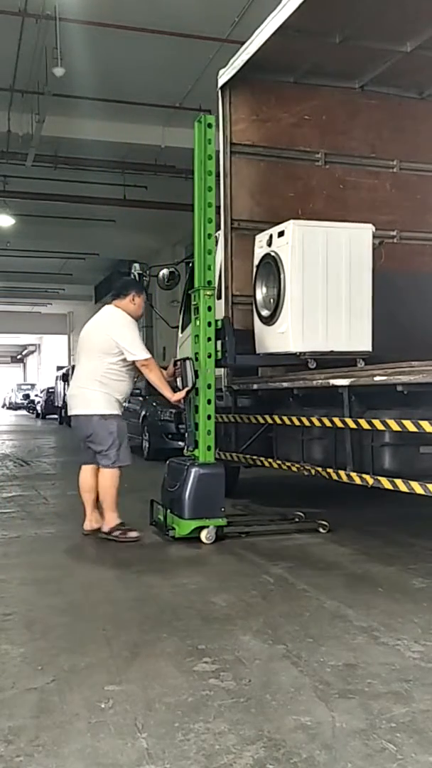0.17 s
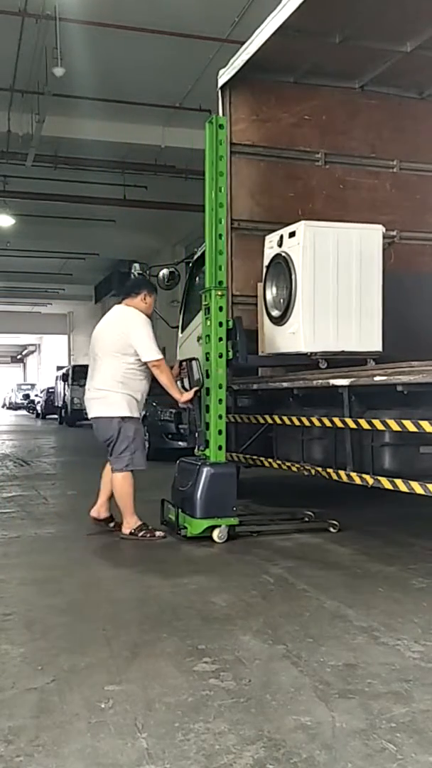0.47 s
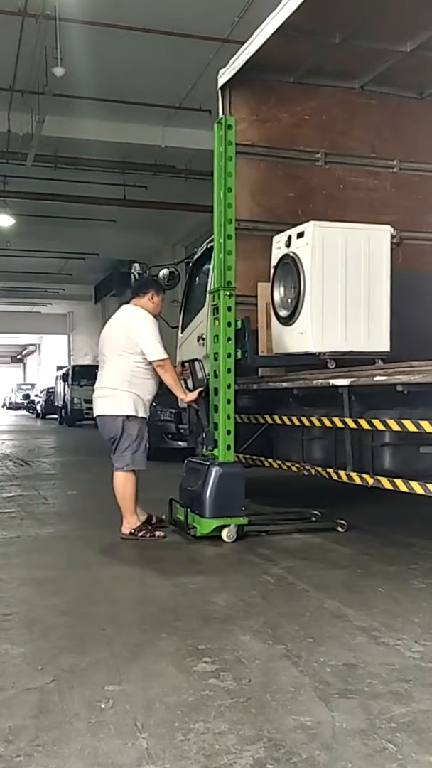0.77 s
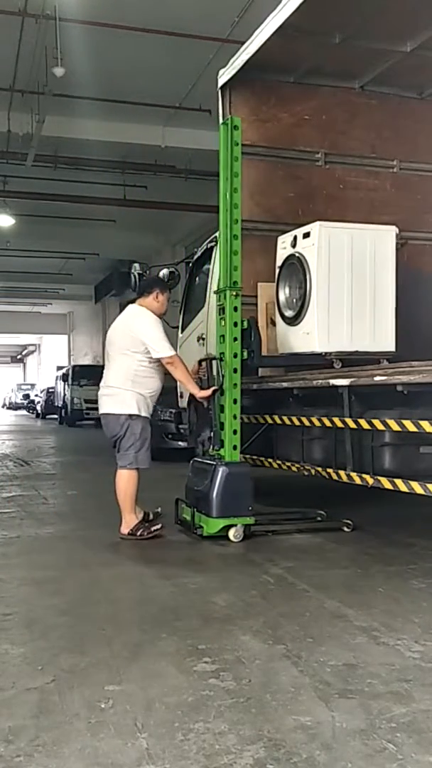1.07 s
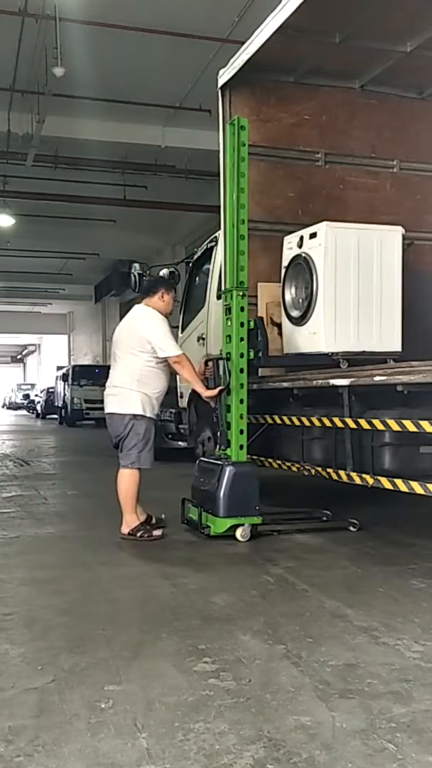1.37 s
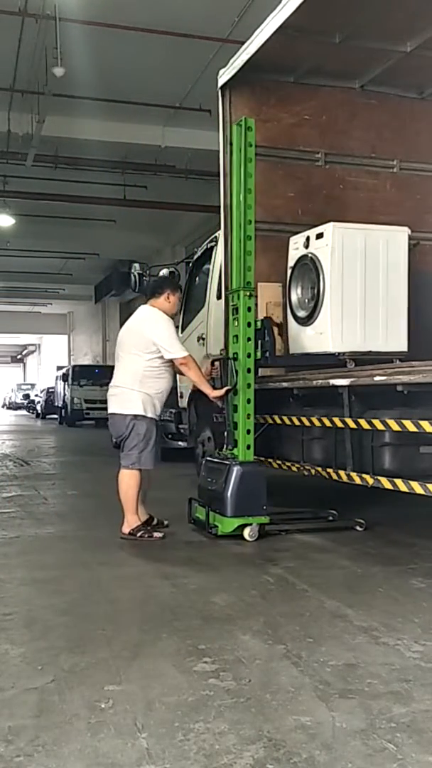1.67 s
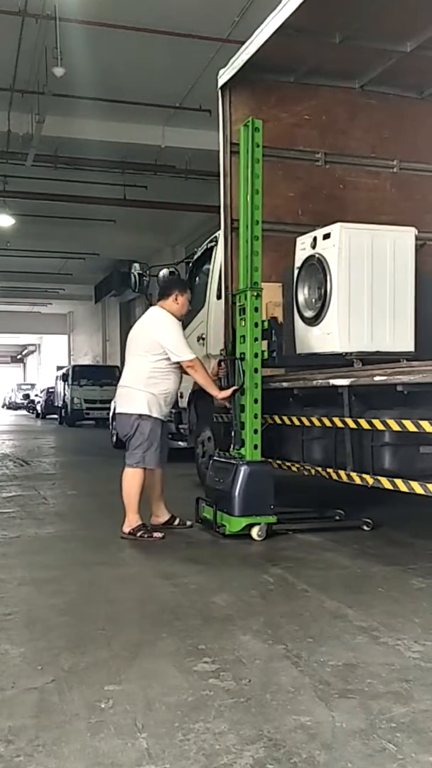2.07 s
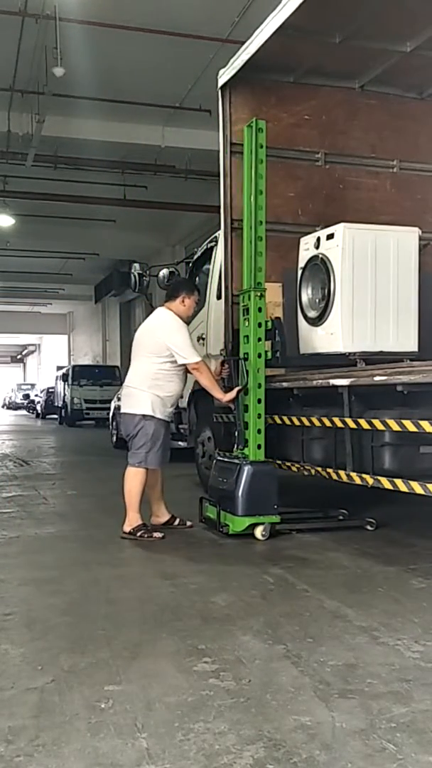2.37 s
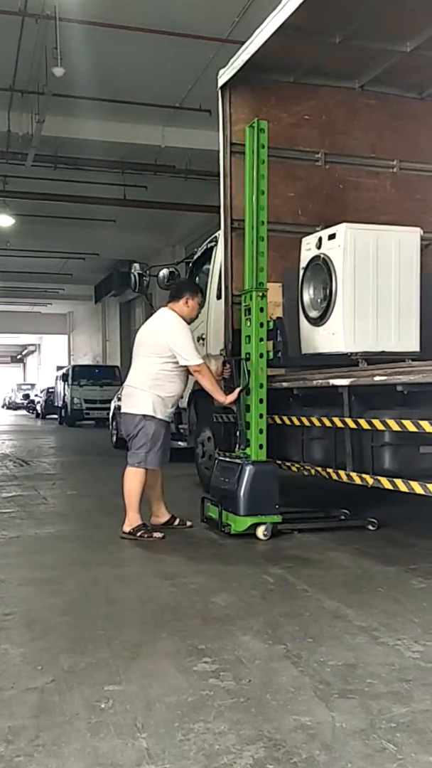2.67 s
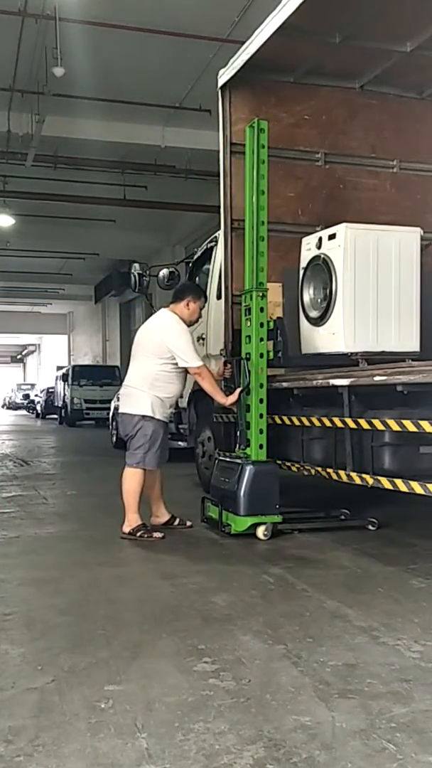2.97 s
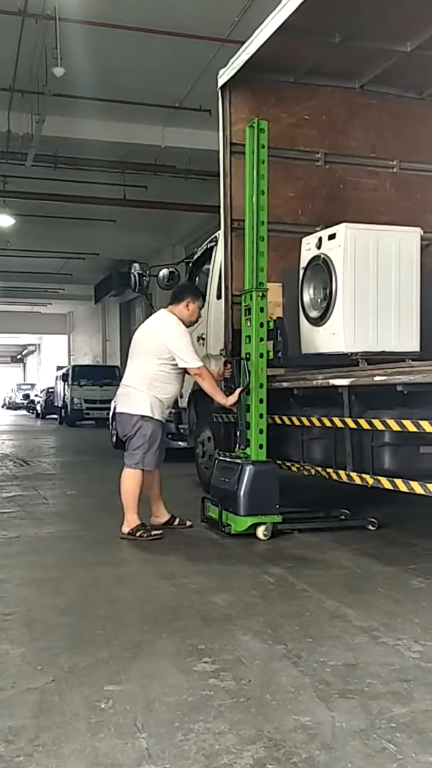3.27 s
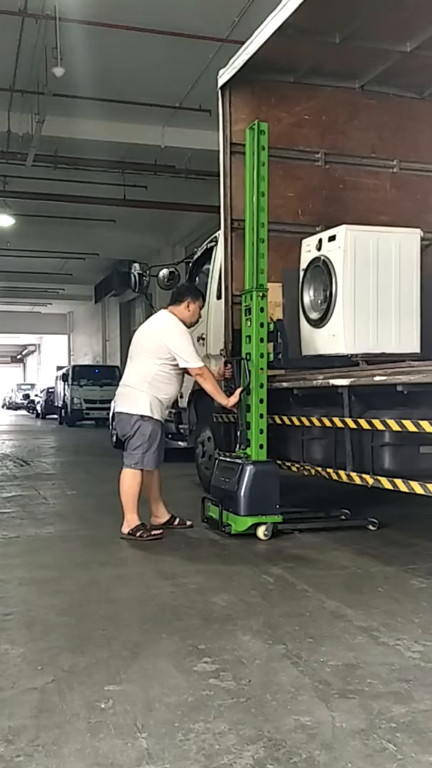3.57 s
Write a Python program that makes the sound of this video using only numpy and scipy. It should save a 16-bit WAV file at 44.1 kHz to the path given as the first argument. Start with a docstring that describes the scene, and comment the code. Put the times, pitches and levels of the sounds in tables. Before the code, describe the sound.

A pallet stacker rumbles and clanks over rough concrete in an echoing bay, then rolls more softly.

```python
"""A pallet stacker is pushed over rough concrete in a covered loading bay, over a steady roar and hum.
To 1.6 s: wheels rumble and rush, bumps thump chassis and forks, the loose mast clanks, the hall rings on.
Then it rolls on more softly, with a last swell of rumble near 3.47 s, still rolling at the end.
Low drones swell near 0.4, 2.4 and 3.47 s; a grainy hiss sets in at 3.5 s, one more clank at 3.72 s.
Blows and grit excite decaying modes plus dense noise; rush, roar, hiss and hall are shaped noise."""
import sys
import numpy as np
from scipy import signal
from scipy.fft import rfft, irfft
from scipy.io import wavfile

SR = 44100
rng = np.random.default_rng(int(sys.argv[2]) if len(sys.argv) > 2 else 0)


def log_audio(samples):
    """Write samples as a 16-bit WAV file to the path given in sys.argv[1]."""
    # one column per channel
    frames = np.atleast_2d(samples).T
    # limit to full scale, then quantise
    limited = np.clip(frames, -1, 1)
    pcm = np.round(limited * 32767).astype(np.int16)
    wavfile.write(sys.argv[1], SR, pcm)


N = 164493

LOW_HALL_SEND_DB = -3  # chassis and forks sit near the floor and feed the hall less


def stacker():
    """Bumps and grit ring chassis, forks and mast, direct and via the hall; the wheels add a rush."""
    chassis_roll, forks_roll, mast_roll = rolling()
    low = chassis_roll + forks_roll + thumps()
    high = mast_roll + clanks()
    reverb = hall(amp(LOW_HALL_SEND_DB) * low + high)
    return low + high + reverb + rush()


# wheel bumps: t/s, chassis thud level/dB, fork knock level/dB, thud lower edge f/Hz
THUMPS = [(.208, 2.5, -6, 121.7), (.303, -5, 7.5, 200), (0.501, 8, 9.5, 130), (0.561, 8, 1, 101),
          (0.611, 5, -11, 147), (0.666, 10.5, 0, 230), (0.723, 1, -5, 198), (.775, 3.5, -5, 120),
          (0.841, 0.5, -9, 120), (1.047, -3, 8, 229), (1.126, 5.5, -3, 150), (1.358, 2.5, 0, 130),
          (1.607, -7, -2.5, 196)]


def thumps():
    """A wheel drops into a dent: chassis and forks are struck once."""
    out = np.zeros((2, N))
    for start_s, thud_db, knock_db, edge_hz in THUMPS:
        thud = amp(thud_db) * above(chassis_ring(), edge_hz)
        knock = amp(knock_db) * forks_ring()
        add(out, start_s, thud + knock)
    return out


# mast slaps: t/s, level/dB, rattle decay to 1/e /s, lower edge f/Hz
CLANKS = [(0.293, 3.5, 0.013, 1000), (.317, 2, 0.0099, 685), (0.371, -6, 0.011, 600),
          (0.485, 1, 0.008, 1710), (.492, 9, 0.023, 970), (0.508, 10.5, 0.015, 750),
          (.556, 0.5, .008, 1310), (.581, -2, .006, 1100), (0.603, -6, 0.0086, 637),
          (.63, -2.5, 0.0091, 800), (0.658, -5, 0.0067, 3070), (0.666, 3, 0.016, 587),
          (.72, -7.5, 0.01, 617), (1.011, 5.5, 0.039, 1150), (1.035, 4, 0.025, 1260),
          (1.119, -1, 0.013, 1210), (1.149, -4, 0.022, 880), (1.35, -1.5, 0.019, 950),
          (1.605, -9, 0.028, 820), (3.72, 5, 0.016, 876)]
RATTLES_PER_S, RATTLE_SHARE = 1200, 0.71  # share: amplitude weight against the first blow
CLANK_CROWD_DB = 3.5  # re tones


def clanks():
    """The loose mast slaps against its guides and rattles: one blow plus fading random impulses."""
    out = np.zeros((2, N))
    t = np.arange(SR // 5) / SR
    for start_s, db, decay_s, edge_hz in CLANKS:
        hits = rng.random(len(t)) < RATTLES_PER_S / SR
        rattle = rng.choice([-1, 1], len(t)) * hits * np.exp(-t / decay_s)
        force = RATTLE_SHARE * unit_energy(rattle) + (1 - RATTLE_SHARE) * (t == 0)
        clank = signal.fftconvolve(force[None], mast_ring(CLANK_CROWD_DB), axes=1)
        add(out, start_s, amp(db) * above(clank, edge_hz))
    return out


GRIT_CROWD_DB = 6  # re tones; grit shakes the mast all over, so its tones stand out less


def rolling():
    """Grit forces convolved with the ring of chassis, forks and mast."""
    parts = chassis_ring(), forks_ring(), mast_ring(GRIT_CROWD_DB)
    return [signal.fftconvolve(force[None], part, axes=1)[:, :N] for force, part in zip(grit(), parts)]


# rolling: t/s, wheel rumble level/dB, grit chatter level/dB
ROLL = [(0, -32.5, -35), (.25, -35.5, -43), (.45, -38.5, -47), (.65, -34.5, -35), (.95, -35.5, -40.5),
        (1.2, -40.5, -42), (1.5, -34.5, -43), (1.7, -45.5, -40.5), (2.0, -39, -44.5), (2.4, -44.5, -50.5),
        (3.0, -42.5, -59), (3.3, -47.5, -56), (3.47, -35.5, -47), (3.73, -49.5, -46)]
GRIT_PER_S, GRIT_SPREAD_DB = 550, 5
FORK_RUMBLE_DB = -3  # re chassis rumble


def grit():
    """Small random knocks of rough concrete under the wheels: one row of force per part."""
    size = amp(GRIT_SPREAD_DB * np.minimum(rng.exponential(1, (3, N)), 4))
    signed = size * rng.choice([-1, 1], (3, N))
    knocks = unit(signed * (rng.random((3, N)) < GRIT_PER_S / SR))
    rumble = level(ROLL, index=1)
    chatter = level(ROLL, index=2)
    return knocks * np.array([rumble, amp(FORK_RUMBLE_DB) * rumble, chatter])


# chassis modes: f/Hz, relative level/dB, t60/s
CHASSIS = [(165.3, -6, 0.14), (223.5, 3.5, 0.23), (260, -3, 0.24), (292.2, -2.5, 0.14), (502.3, -9.5, 0.3),
           (530.3, -3.5, 0.36)]
# dense resonances of chassis and forks: f/Hz, relative density level/dB per Hz
THUD = [(40, -13.5), (140, 1.5), (250, 1), (450, -2), (550, -1), (680, -9.5), (1100, -9), (2000, -31.5),
        (5000, -47.5), (15000, -87)]
CHASSIS_CROWD_DB = -7.5  # re tones


def chassis_ring():
    """The chassis answers one blow with low modes over a short thud."""
    return ring(CHASSIS, THUD, CHASSIS_CROWD_DB)


# fork modes: f/Hz, relative level/dB, t60/s
FORKS = [(371, 1, 0.22), (787, -17, 0.13)]
FORKS_CROWD_DB = -16.5  # re tones


def forks_ring():
    """The forks answer one blow with two modes over a faint short thud."""
    return ring(FORKS, THUD, FORKS_CROWD_DB)


# mast modes: f/Hz, relative level/dB, t60/s
MAST = [(1009, -3, 0.17), (1205, -6, 0.079), (1331.4, -1.5, 0.23), (1748, -7, 0.11), (2330, -5, 0.28),
        (2500, -3.5, 0.16), (2542, -5.5, 0.14), (2630, -3, 0.14), (2694, -9, 0.13), (3343, -12, .07),
        (3510, -8, 0.15), (3600, -14.5, 0.082), (4430, -13.5, 0.11)]
# dense resonances of the mast: f/Hz, relative density level/dB per Hz
CLATTER = [(100, -27.5), (400, -3), (700, 2), (1000, 6), (1350, -1.5), (2000, -1.5), (2700, -1), (3700, -9),
           (5200, -23.5), (6400, -25.5), (8000, -50), (12000, -51.5), (15000, -48.5)]


def mast_ring(crowd_db):
    """The steel mast answers one blow with high modes over a short clatter."""
    return ring(MAST, CLATTER, crowd_db)


CROWD_T60_S, CONTACT_S = 0.053, 0.0024
STRIKE_DETUNE, STRIKE_SPREAD_DB = 0.0053, 2.5  # rms, detune as fraction of f; no two blows land alike


def ring(modes, crowd, crowd_db):
    """Response to one blow: dying tones with a left-right phase gap, plus dense decaying noise."""
    size = SR // 3
    t = np.arange(size) / SR
    tones = 0
    for hz, db, t60_s in modes:
        detune, weight, side = rng.standard_normal(3)
        # phase gap that gives the tone its left-right correlation
        lead = np.sign(side) * np.arccos(np.clip(at_hz(ALIKE, hz), -1, 1)) / 2
        struck_hz = hz * (1 + STRIKE_DETUNE * detune)
        tone = np.sin(2 * np.pi * struck_hz * t + [[lead], [-lead]])
        tones = tones + amp(db + STRIKE_SPREAD_DB * weight) * unit_energy(tone * amp(-60 * t / t60_s))
    dense = colour(pair(size), crowd) * amp(-60 * t / CROWD_T60_S)
    both = unit_energy(tones) + amp(crowd_db) * unit_energy(dense)
    soft_onset = 1 - np.exp(-(t / CONTACT_S) ** 2)
    return unit_energy(both * soft_onset)


# spectrum of the rush: f/Hz, relative density level/dB per Hz
RUSH = [(100, -3), (400, 6), (800, 4), (1100, 1.5), (1800, -11), (2800, -13), (4200, -14), (5200, -22.5),
        (6500, -43.5), (8000, -46.5), (9700, -60), (11700, -40), (14500, -54)]
# rush over time: t/s, level/dB
RUSH_LEVEL = [(0, -30.5), (.4, -33), (.65, -28.5), (1, -37), (1.5, -36.5), (1.72, -33), (2.1, -36),
              (2.5, -39.5), (3, -50), (3.73, -40)]


def rush():
    """Soft rush of the wheels on concrete: coloured stereo noise."""
    return level(RUSH_LEVEL) * unit(colour(pair(N), RUSH))


# hall decay: f/Hz, t60/s
HALL = [(100, 0.7), (400, 0.45), (1000, 1.04), (2700, 0.77), (6000, 0.68), (13000, 0.52)]
HALL_DB, HALL_BUILD_S = -4, 0.018


def hall(x):
    """Tail of the concrete bay: noise decaying per frequency, after a linear build-up."""
    hz, s, bins = signal.stft(pair(SR), SR, nperseg=256)
    decayed = bins * amp(-60 * s / at_hz(HALL, hz)[:, None])
    tail = signal.istft(decayed, SR, nperseg=256)[1][:, :SR]
    tail = tail * np.minimum(np.arange(SR) / SR / HALL_BUILD_S, 1)
    return amp(HALL_DB) * signal.fftconvolve(x, unit_energy(tail), axes=1)[:, :N]


# spectrum of the hiss: f/Hz, relative density level/dB per Hz
HISS = [(200, 3), (700, 4), (1400, -2), (2200, -6.5), (3200, -2.5), (4400, -13.5), (5200, -19), (6500, -21),
        (9000, -37), (11000, -30), (13000, -22), (15000, -49)]
# hiss over time: t/s, level/dB
HISS_LEVEL = [(3.505, -60), (3.517, -38.5), (3.54, -33.5), (3.59, -38), (3.68, -38.5), (3.73, -35.5)]
HISS_GRAIN_DB, HISS_GRAIN_HZ = 1, 181  # rms depth, corner of the flutter


def hiss():
    """A hiss that starts with a spurt and holds: coloured noise with random level flutter."""
    started = np.arange(N) / SR > HISS_LEVEL[0][0]
    grain = amp(HISS_GRAIN_DB * drift(HISS_GRAIN_HZ))
    return started * level(HISS_LEVEL) * unit(colour(pair(N), HISS) * grain)


# drones: middle t/s, half length to 1/e /s, f/Hz, level at the middle/dB
DRONES = [(0.406, 0.053, 307, -33.5), (2.398, 0.085, 123, -35), (3.47, 0.055, 237, -36.5)]
DRONE_WAVER_HZ = 3.06  # rms


def drones():
    """Low tones of wavering pitch that swell out of the rumble and sink back."""
    t = np.arange(N) / SR
    out = 0
    for middle_s, half_s, hz, db in DRONES:
        swell = np.exp(-((t - middle_s) / half_s) ** 2)
        out = out + amp(db) * swell * unit(wavering_tone(hz, DRONE_WAVER_HZ, 9.4))
    return out


# spectrum of the bay's roar: f/Hz, relative density level/dB per Hz
AIR = [(12, -19), (22, -8.5), (56, -10.5), (80, -1), (105, -3), (140, -2), (195, -5), (245, -5.5),
       (320, -6), (450, -13), (700, -13.5), (1100, -17.5), (1700, -19), (2200, -22.5), (3200, -25),
       (4400, -32), (6200, -47.5), (7500, -114), (12000, -66), (14500, -74.5)]
AIR_DB = -33


def background():
    """Steady roar of the bay, coloured stereo noise, with the machine hum."""
    return amp(AIR_DB) * unit(colour(pair(N), AIR)) + machine_hum()


# far machinery: f/Hz, level/dB
HUM = [(97, -44), (193.8, -39.5)]
HUM_WAVER_HZ, HUM_SWAY = 0.93, 0.36  # rms pitch, rms fraction of amplitude


def machine_hum():
    """Far machinery: tones wavering in pitch and level."""
    out = 0
    for hz, db in HUM:
        sway = 1 + HUM_SWAY * drift(5.7)
        out = out + amp(db) * unit(sway * wavering_tone(hz, HUM_WAVER_HZ, 3.3))
    return out


def wavering_tone(hz, waver_hz, rate_hz):
    """A sine whose frequency drifts at random."""
    return np.sin(2 * np.pi * np.cumsum(hz + waver_hz * drift(rate_hz)) / SR)


def drift(hz):
    """Random signal of rms 1, low-passed at a corner frequency."""
    lowpass = 1 + (np.fft.rfftfreq(N, 1 / SR) / hz) ** 4
    return unit(irfft(rfft(rng.standard_normal(N)) / lowpass, N))


# microphone pair: f/Hz, left-right correlation
ALIKE = [(30, 0.98), (70, 1), (130, 0.94), (300, 0.95), (380, 0.9), (520, 0.72), (900, -0.056),
         (2000, 0.14), (4000, 0.091), (14000, -0.32)]


def pair(size):
    """Diffuse noise at two close microphones: strongly alike only in the lows."""
    a, b = rfft(rng.standard_normal((2, size)))
    alike = np.clip(at_hz(ALIKE, np.fft.rfftfreq(size, 1 / SR)), -.999, .999)
    mid, side = a * np.sqrt(1 + alike), b * np.sqrt(1 - alike)
    return unit(irfft(np.array([mid + side, mid - side]), size))


def colour(x, points):
    """Filters x by a table of dB over frequency."""
    size = x.shape[-1]
    return irfft(rfft(x) * amp(at_hz(points, np.fft.rfftfreq(size, 1 / SR))), size)


def above(x, edge_hz):
    """High-pass at an edge; energy 1 per channel on average."""
    return unit_energy(signal.lfilter(*signal.butter(3, edge_hz, "high", fs=SR), x))


def add(mix, start_s, sound):
    """Mixes a sound in at a time, cut at the end of the mix."""
    part = mix[:, round(start_s * SR):][:, :sound.shape[1]]
    part += sound[:, :part.shape[1]]


def level(points, index=1):
    """A column of dB over time as a gain per sample."""
    rows = np.array(points)
    return amp(np.interp(np.arange(N) / SR, rows[:, 0], rows[:, index]))


def at_hz(points, hz):
    """Reads a table along log frequency."""
    f, value = np.transpose(points)
    return np.interp(np.log(hz + 1), np.log(f + 1), value)


def amp(db):
    """Decibels to gain."""
    return 10 ** (np.asarray(db) / 20)


def unit(x):
    """Scales to rms 1."""
    return x / np.sqrt(np.mean(x ** 2) + 1e-20)


def unit_energy(x):
    """Scales a response to energy 1 per channel on average."""
    return unit(x) / np.sqrt(x.shape[-1])


def scene():
    """The whole loading bay."""
    return stacker() + hiss() + drones() + background()


# microphone imbalance: f/Hz, level/dB added on the left and taken off the right
TILT = [(400, 0), (2200, .2), (4000, 1.8), (6000, -5.5), (8000, -3.5), (12000, -4)]
NOTCH_HZ, NOTCH_Q = 4740, 80  # a narrow dip of the microphone
EDGE_HZ = 14500


def record(dry):
    """The two microphones' unequal treble, their dip and the recorder's band limit."""
    left = colour(dry[0], TILT)
    right = colour(dry[1], [(hz, -db) for hz, db in TILT])
    heard = signal.lfilter(*signal.iirnotch(NOTCH_HZ, NOTCH_Q, SR), np.array([left, right]))
    lowpass = signal.firwin(511, EDGE_HZ, window=("kaiser", 9), fs=SR)
    return signal.oaconvolve(heard, lowpass[None], "same")


dry = scene()
out = record(dry)
log_audio(out)
```